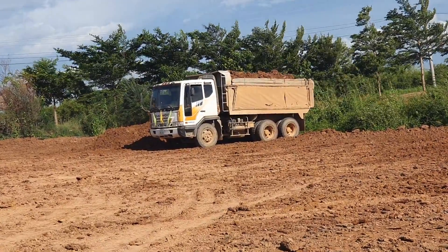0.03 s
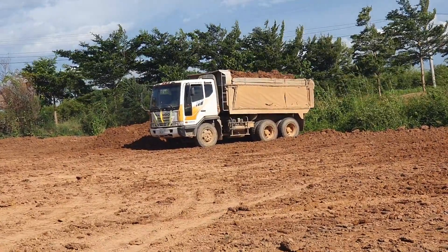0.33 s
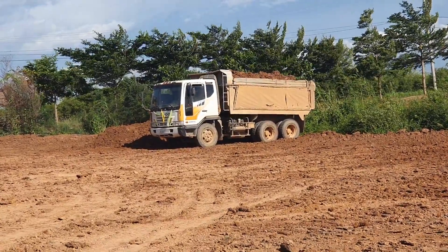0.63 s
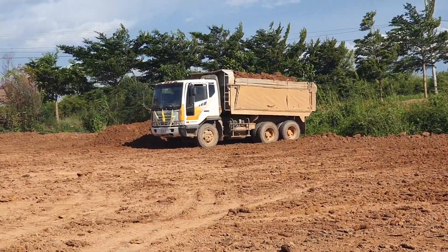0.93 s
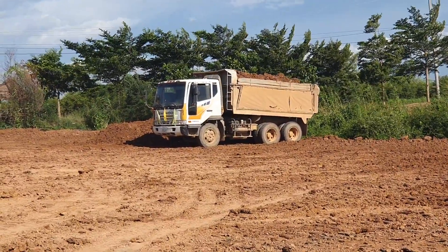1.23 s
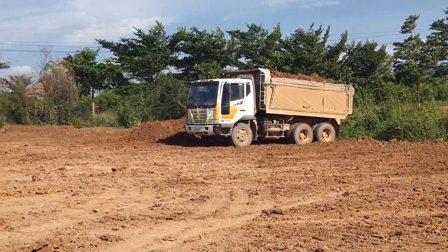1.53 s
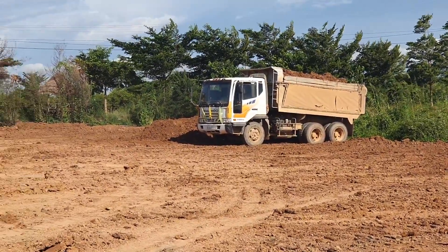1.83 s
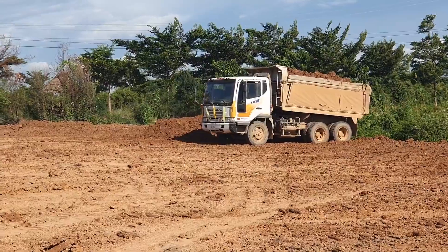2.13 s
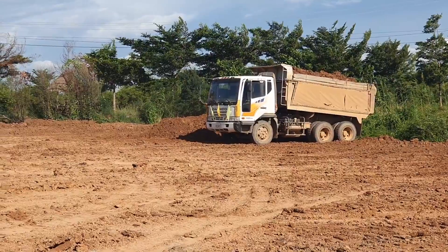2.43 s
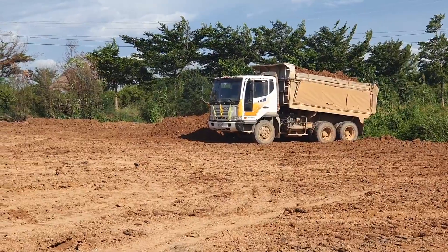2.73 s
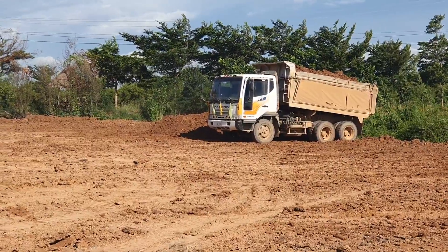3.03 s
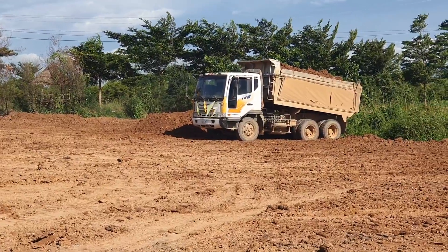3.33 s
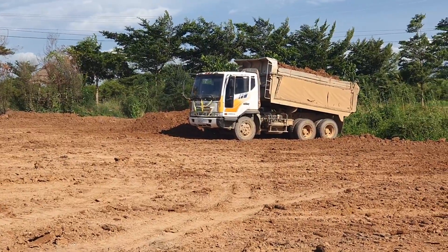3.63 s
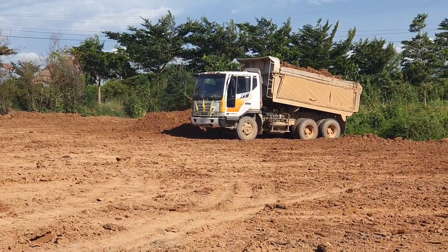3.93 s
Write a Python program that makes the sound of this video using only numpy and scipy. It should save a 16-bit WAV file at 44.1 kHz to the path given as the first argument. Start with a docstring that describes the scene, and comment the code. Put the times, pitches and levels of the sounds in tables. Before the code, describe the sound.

Wind buffets the microphone while a diesel dump truck clatters some way off.

```python
"""A diesel dump truck starts to tip its bed, some way off on an open dirt lot. Its firings blur into a
clatter with ringing panels, exhaust and the odd rasp; the gears whirr and whine, and metal chafes faintly.
Trees rustle throughout, and for the first second a high hiss pulses about eleven times a second.
Up close, gusts hit the microphone: a low rumble, a flutter of short eddies and single buffets that
thud or slap, different at the two ports."""
import sys
import numpy as np
from scipy import signal
from scipy.fft import rfft, irfft, next_fast_len
from scipy.io import wavfile
from scipy.ndimage import uniform_filter1d, map_coordinates

SR = 44100
rng = np.random.default_rng(int(sys.argv[2]) if len(sys.argv) > 2 else 0)


def generate_wav(sig):
    """Save sig (samples, or channels by samples) to the path in sys.argv[1] as 16-bit PCM at SR."""
    pcm = np.round(np.clip(np.atleast_2d(sig).T, -1, 1) * 32767).astype(np.int16)
    wavfile.write(sys.argv[1], SR, pcm)


N = 176400


def amp(db):
    """Decibels to gain."""
    return 10 ** (np.asarray(db) / 20)


def unit(x):
    """Scale to rms 1."""
    return x / np.sqrt(np.mean(x ** 2) + 1e-20)


def along(points, hz):
    """Read an EQ curve of (f/Hz, value) points on a log frequency axis."""
    f, v = np.transpose(points)
    return np.interp(np.log(hz + 1), np.log(f + 1), v)


def curve(rows):
    """An envelope through (t/s, value) points, one value per sample."""
    return np.interp(np.arange(N) / SR, *np.transpose(rows))


def wobble(rate):
    """A smooth random modulator, rate knots a second."""
    return map_coordinates(rng.standard_normal(2048), [np.arange(N) * rate / SR], mode="mirror")


def filtered(x, response):
    """Filter x by a gain given as a function of frequency."""
    size = next_fast_len(N + SR // 2)
    return irfft(rfft(x, size) * response(np.fft.rfftfreq(size, 1 / SR)), size)[..., :N]


def coloured(x, spectrum):
    """x through an EQ curve, at rms 1."""
    return unit(filtered(x, lambda hz: amp(along(spectrum, hz))))


def stereo(mid, side, alike):
    """Mix two unrelated signals to left and right with correlation alike."""
    angle = np.arccos(np.clip(alike, -1, 1)) / 2
    mid, side = np.cos(angle) * mid, np.sin(angle) * side
    return np.array([mid + side, mid - side])


def noise(alike):
    """White stereo noise with a given left-right correlation."""
    return stereo(*rng.standard_normal((2, N)), alike)


def churn(rate, depth_db):
    """A random gain of rms 1, each port its own."""
    return unit(amp(depth_db * np.array([wobble(rate), wobble(rate)])))


def drifting(x, depth_db):
    """x with patches of random gain over frequency and time, at rms 1."""
    spectra = signal.stft(x, nperseg=512)[2]
    patches = uniform_filter1d(rng.standard_normal(spectra.shape[1:]), size=7, axis=0)
    patches = uniform_filter1d(patches, size=12, axis=1)
    return unit(signal.istft(spectra * amp(depth_db * unit(patches)), nperseg=512)[1][:, :N])


def fuzzy_tone(hz, width_hz):
    """A narrow band of noise around a pitch that may move, at rms 1."""
    phase = 2 * np.pi * np.cumsum(hz * np.ones(N)) / SR
    return unit(wobble(width_hz) * np.cos(phase) + wobble(width_hz) * np.sin(phase))


def swells(rows):
    """An envelope of short bell-shaped swells."""
    t = np.arange(N) / SR
    return sum(amp(db) * np.exp(-.5 * ((t - s) / half) ** 2) for s, db, half in rows)


# clatter envelope: t/s, level/dB
CLATTER_LEVEL = [(0, -50), (.35, -51), (.56, -49.5), (.75, -50), (.82, -52.5), (.95, -53.5), (1.11, -49.5),
                 (1.19, -51), (1.3, -47), (1.41, -52), (1.56, -49.5), (1.63, -57.5), (2.3, -56.5),
                 (2.42, -52.5), (2.53, -56.5), (2.72, -55), (2.81, -53.5), (3.05, -54.5), (3.16, -51.5),
                 (3.3, -52), (3.45, -54.5), (4, -50.5)]
# clatter tone: f/Hz, level/dB
CLATTER_EQ = [(400, -62), (800, 1), (1150, -7.5), (1550, 0), (2000, -5), (2600, -9), (3100, -14.5),
              (3800, -16.5), (4800, -14.5), (6000, -20.5), (8000, -33), (15000, -62)]
# engine panel resonances: f/Hz, width/Hz, level/dB
PANEL_MODES = [(1454, 67, -9.5), (1830, 130, -1), (2593, 44, 0.5), (2693, 34, -7), (4820, 110, -16)]
# panel ring against the clatter: t/s, level/dB
RING_LEVEL = [(0, -10), (.55, -4.5), (1.3, -10), (2.05, -4.5), (2.4, -11), (4, -10.5)]
# exhaust tone: f/Hz, level/dB
EXHAUST_EQ = [(20, -10), (40, -8), (70, -12), (110, -3), (170, -24), (300, 0.5), (450, -1), (700, -5.5),
              (1000, -15), (1400, -17.5), (3000, -47)]
FIRING_HZ, KNOCK_S, KNOCK_SHARE = 32.82, 0.0054, 0.14
EXHAUST_DB, EXHAUST_FOLLOWS = -43.5, 0.55  # the exhaust swells with the clatter, but less


def engine():
    """Each firing knocks the block, rings its panels and puffs the exhaust; distance blurs the beat."""
    def panels(f):
        return sum(amp(db) * 1j * f * width / (hz * hz - f * f + 1j * f * width)
                   for hz, width, db in PANEL_MODES)

    firings = np.cumsum(FIRING_HZ * (1 + .01 * wobble(3.3))) / SR
    accent = amp([9, 0, -5, 3, 3.5, -1.5])[firings.astype(int) % 6]  # six uneven cylinders
    knock = unit(accent * np.exp(-(firings % 1) / FIRING_HZ / KNOCK_S))
    beat = np.sqrt(1 - KNOCK_SHARE + KNOCK_SHARE * knock ** 2) * amp(.65 * wobble(17))
    clatter = drifting(coloured(beat * noise(0.88), CLATTER_EQ), depth_db=1.5)
    ring = unit(filtered(beat * noise(0.83), panels))
    exhaust = coloured(beat * noise(0.56), EXHAUST_EQ)
    level_db = curve(CLATTER_LEVEL)
    exhaust_db = EXHAUST_DB + EXHAUST_FOLLOWS * (level_db - level_db.mean())
    return amp(level_db) * (clatter + amp(curve(RING_LEVEL)) * ring) + amp(exhaust_db) * exhaust


# gear whirr pitch: t/s, f/Hz
WHIRR_PITCH = [(0, 2340), (.7, 2365), (1.0, 2320), (1.3, 2220), (2.8, 2244), (3.1, 2234), (4, 2314)]
# whirr envelope: t/s, level/dB
WHIRR_LEVEL = [(0, -64.5), (.45, -56), (.8, -62), (1.2, -55.5), (1.45, -59), (1.63, -69.5), (2.5, -66.5),
               (2.85, -62.5), (3.4, -71), (3.85, -66), (4, -66)]
# whine envelope: t/s, level/dB
WHINE_LEVEL = [(0, -67), (.35, -63.5), (.6, -69), (1.05, -69), (1.35, -79.5), (4, -74)]


def gears():
    """A wavering whirr that sags under load, and a thin whine above it that soon fades."""
    whirr = fuzzy_tone(curve(WHIRR_PITCH) + 25 * wobble(15), width_hz=170)
    whirr = unit(whirr * amp(3 * wobble(16)))  # level flicker
    whine = fuzzy_tone(hz=4070, width_hz=165)
    return amp(curve(WHIRR_LEVEL)) * whirr + amp(curve(WHINE_LEVEL)) * whine


# rustle envelope: t/s, level/dB
RUSTLE_LEVEL = [(0, -59.5), (1.25, -59), (1.53, -59.5), (1.63, -62.5), (2.1, -62.5), (2.5, -60),
                (2.8, -62.5), (3.02, -58.5), (3.12, -60.5), (3.33, -57.5), (3.55, -57), (3.7, -59),
                (4, -58.5)]
# leaf tone: f/Hz, level/dB
LEAF_EQ = [(1500, -4), (3200, 4), (5000, 2), (6500, -1), (8000, -8.5), (9200, -4), (10500, -1.5),
           (12500, -2), (14000, -6), (15600, -13)]
# leaf pan: f/Hz, left minus right/dB
LEAF_PAN = [(4000, 0.5), (8000, 0), (12000, -7), (15000, -5)]
# high shelf on the rustle: t/s, level/dB
RUSTLE_SHELF = [(0, 2), (1.6, -0.5), (2.5, 2.5), (3.3, 0.5), (3.8, -3.5), (4, -2)]


def trees():
    """Leaves rustle in the wind, brighter on the right."""
    rustle = coloured(noise(0.079), LEAF_EQ)
    rustle = filtered(rustle, lambda hz: amp(np.outer([.5, -.5], along(LEAF_PAN, hz))))
    top = filtered(rustle, lambda hz: np.clip((hz - 6000) / 3000, 0, 1))
    shelf = (amp(curve(RUSTLE_SHELF)) - 1) * top
    return amp(curve(RUSTLE_LEVEL) + .4 * wobble(12)) * (rustle + shelf)


def grains(times, gains, hz, width_s):
    """Sum of short pressure wavelets with random phase."""
    offsets = np.arange(-(SR // 128), SR // 128)
    t = offsets / SR
    bell = gains[:, None] * np.exp(-.5 * (t / width_s[:, None]) ** 2)
    carrier = np.cos(2 * np.pi * (hz[:, None] * t + rng.random((len(times), 1))))
    wavelets = bell * carrier * signal.windows.tukey(len(t))
    at = (np.round(times * SR).astype(int)[:, None] + offsets).clip(-1, N) + 1
    return np.bincount(at.ravel(), wavelets.ravel(), N + 2)[1:-1]


EDDY_HZ, EDDY_SPREAD, EDDY_CYCLES, EDDY_SCATTER_DB = 335, .25, .8, 5.5
EDDY_OCTAVES_PER_DB, EDDY_FALL_DB_PER_OCTAVE = .035, -5


def eddies(gust_db, count=2000):
    """Small eddies stream past one port, pitched higher in stronger gusts; rms 1."""
    times = (np.arange(count) + rng.random(count)) / count * N / SR
    pitch, size = rng.standard_normal((2, count))
    octaves = EDDY_SPREAD / np.log(2) * pitch
    gust_lift = EDDY_OCTAVES_PER_DB * gust_db[(times * SR).astype(int).clip(0, N - 1)]
    hz = EDDY_HZ * 2 ** (octaves + gust_lift)
    level_db = EDDY_SCATTER_DB * np.minimum(size, 2) + EDDY_FALL_DB_PER_OCTAVE * np.maximum(octaves, 0)
    return unit(grains(times, amp(level_db), hz, width_s=EDDY_CYCLES / hz))


# gust envelope driving flutter and wash: t/s, level/dB
GUST_LEVEL = [(0, -43), (.14, -38.5), (.22, -42), (.36, -42.5), (.46, -33.5), (.6, -43), (.78, -47),
              (.92, -49), (1.04, -38), (1.22, -32), (1.3, -37.5), (1.4, -38), (1.44, -32.5), (1.56, -34),
              (1.67, -37.5), (1.88, -42.5), (1.98, -35.5), (2.05, -40.5), (2.21, -34), (2.265, -38),
              (2.32, -36.5), (2.38, -29.5), (2.43, -42.5), (2.49, -34), (2.53, -36.5), (2.66, -43.5),
              (2.78, -30), (2.84, -38), (2.92, -34), (2.97, -38.5), (3.06, -35.5), (3.19, -38),
              (3.3, -30.5), (3.39, -31.5), (3.51, -28.5), (3.6, -32.5), (3.66, -36), (3.76, -29),
              (3.83, -33), (4, -34)]
# wash tone: f/Hz, level/dB
WASH_EQ = [(60, -14), (120, -5), (175, -8), (260, 0), (440, -.5), (600, -10), (780, -23), (1000, -35),
           (1600, -46), (3000, -52), (8000, -67)]
# rumble envelope, before its trim: t/s, level/dB
RUMBLE_LEVEL = [(0, -29.5), (.24, -39.5), (.48, -31), (.66, -37), (.76, -42), (.93, -44.5), (1.2, -30),
                (1.4, -38), (1.58, -30), (1.69, -34), (1.8, -45), (1.92, -44), (2.15, -35), (2.3, -39),
                (2.52, -37), (2.63, -42), (2.8, -33.5), (3.02, -39), (3.45, -32.5), (3.7, -37), (4, -31.5)]
# rumble tone: f/Hz, level/dB
RUMBLE_EQ = [(10, -6), (25, -27), (45, -0.5), (70, -3), (115, -5), (170, -13), (300, -19.5), (800, -64.5)]
EDDY_TRIM_DB, WASH_TRIM_DB, RUMBLE_TRIM_DB, WASH_GROWS = 1, -1, 2, 1.24


def wind():
    """Gusts on the microphone drive eddies and a turbulent wash, over a lumpy rumble."""
    level_db = curve(GUST_LEVEL)
    gust_db = level_db - level_db.mean()
    flutter = amp(EDDY_TRIM_DB + gust_db) * np.array([eddies(gust_db), eddies(gust_db)])
    wash = coloured(noise(0.078), WASH_EQ) * churn(rate=130, depth_db=4.0)
    wash *= amp(WASH_TRIM_DB + WASH_GROWS * gust_db)
    surge = unit(amp(2.5 * wobble(27.98)))
    rumble = coloured(noise(-0.021) * churn(rate=34, depth_db=3.0), RUMBLE_EQ)
    rumble *= amp(RUMBLE_TRIM_DB + curve(RUMBLE_LEVEL))
    return amp(level_db.mean()) * surge * (flutter + wash) + rumble


# wind hits, before trim and stretch:
# peak t/s, level/dB, length/s, f/Hz, left minus right/dB, left-right correlation, hard edge/dB
BUFFET_HITS = [(0.04, -24, 0.0078, 360, 1, 0.5, -7), (0.086, -31.5, 0.018, 337, 3.5, -0.65, -6),
               (0.107, -26, .065, 70, 1, -1.07, 9), (0.265, -28, 0.015, 320, 4, 0.24, -10),
               (0.332, -22.5, 0.044, 82, -3, -.6, 12), (0.342, -26.5, 0.016, 264, 3, -.3, -6),
               (0.427, -20.5, .011, 355, -4, -0.46, -4), (0.468, -21, 0.015, 290, 2, 0.6, 1),
               (0.479, -27, 0.036, 75, 0, .9, 3), (0.558, -23.5, 0.0069, 300, 4, .9, -4),
               (.619, -26.5, 0.013, 129, 5, 0.89, 0), (0.662, -27, 0.014, 358, 0, 0.82, -17),
               (1.116, -23, 0.021, 80, 2, -.95, 3), (1.117, -19.5, 0.011, 320, 3, -0.99, -2),
               (1.159, -20.5, 0.018, 315, 0, -0.59, -3), (1.206, -21, 0.015, 317, 6, 0.14, 9),
               (1.244, -22, 0.01, 217, 3, 0.9, -9), (1.268, -34, 0.09, 72, 2, -0.16, 9),
               (1.272, -20, 0.0083, 323, 0, 0.22, -2), (1.301, -18.5, 0.013, 363, 3, 0.33, 6),
               (1.312, -16.5, 0.012, 378, -2.5, -0.052, -4), (1.337, -29, 0.0065, 433, 4, 0.17, 11),
               (1.367, -27, 0.016, 315, -4, -0.12, -4), (1.452, -30, 0.027, 385, -3, -.3, -7),
               (1.484, -33, 0.021, 90, -6, 0.79, -7), (1.497, -22.5, 0.0072, 355, 3, 0.23, -2),
               (1.532, -20, 0.031, 275, -1, -0.003, -5), (1.552, -20, 0.0076, 350, 4, 0.23, 11),
               (1.56, -36, 0.0053, 1010, 9, 0.19, -5), (1.571, -21, 0.017, 382, -2, 0.19, -2),
               (1.586, -22, 0.036, 65, -3, -.6, -2), (1.604, -27, 0.014, 197, 0, .6, 9),
               (1.645, -27, 0.0091, 317, 5, .3, -15), (1.712, -26, 0.0085, 308, -3, 0.21, 0),
               (1.991, -28, .02, 130, 2, 0.77, -4), (1.992, -25, 0.016, 326, -5, .2, 7),
               (2.096, -20.5, 0.012, 293, 0, -0.4, 0), (2.147, -31, .007, 398, -1, 0.21, 5),
               (2.183, -23, 0.012, 310, -7, -0.88, -4), (2.186, -25.5, .024, 99, 1, .7, -7),
               (2.21, -24, 0.0056, 553, 3, .4, -12), (2.218, -23, 0.027, 402, 1.5, -0.16, -2),
               (2.288, -25, 0.01, 365, 0, 0.26, -8), (2.308, -18.5, .012, 378, 2.5, -0.3, 2),
               (2.327, -22, 0.0084, 337, -0.5, 0.5, -4), (2.374, -25, 0.016, 480, 10, 0.67, -3),
               (2.457, -22, 0.0054, 390, 8, -0.0051, 4), (2.482, -20, 0.013, 330, 0, .1, -4),
               (2.568, -19, 0.0078, 365, 2.5, 0.46, -11), (2.615, -28, 0.017, 348, 4, -0.24, -6),
               (2.735, -20.5, 0.026, 364, 2.5, -.2, -12), (2.753, -25, 0.018, 89, 17, .6, 0),
               (2.77, -18.5, 0.015, 300, 1, 0.3, -2), (2.79, -25, 0.011, 433, 6, 0.03, 8),
               (2.812, -30, 0.027, 110, -10, 0.46, 0), (3.018, -21, .011, 304, -3.5, -0.74, -10),
               (3.051, -24, 0.01, 324, 5, 0.3, -2), (3.077, -28, 0.025, 330, -11, -0.61, 0),
               (3.095, -23.5, 0.023, 92, 0, 0.84, 9), (3.149, -24, 0.017, 332, 6, 0.11, 11),
               (3.245, -28, .009, 403, 0, 0.48, 11), (3.276, -18, 0.012, 456, 1, -0.002, -5),
               (3.298, -20, 0.012, 376, 4, 0, 12), (3.308, -23, .008, 220, -3, 0.72, 4),
               (3.365, -21.5, 0.014, 380, 2, 0.16, -1), (3.405, -26, .017, 99, 9, 0.79, 2),
               (3.408, -27, .014, 350, -3, .3, 3), (3.459, -22, 0.015, 293, 1, 0, 0),
               (3.478, -28, .03, 90, -8, 0.88, 0), (3.491, -20.5, 0.011, 320, -6, 0.46, 5),
               (3.519, -26, 0.02, 328, -4, 0, 14), (3.531, -21.5, 0.017, 574, 2, .3, -10),
               (3.563, -21, 0.0099, 460, 2, 0.15, 15), (3.604, -22.5, 0.029, 340, -12, -0.24, 1),
               (3.607, -23.5, .026, 80, -4, -.7, 0), (3.63, -28.5, .007, 520, 6, 0.11, 5),
               (3.677, -24.5, 0.014, 387, 3.5, -0.34, 0), (3.718, -21, .016, 335, 4, -0.34, 6),
               (3.741, -20.5, 0.013, 380, 4, 0.5, 10), (3.783, -20, .012, 403, 4, .5, 1),
               (3.79, -15.5, 0.0076, 337, 0.5, -0.68, 2), (3.858, -27, .03, 90, -6, -0.52, 2),
               (3.863, -16, 0.013, 362, 2, -0.0081, 0), (3.886, -28, 0.0069, 368, -6, -0.99, 4),
               (3.918, -23, 0.019, 90, 2, .7, 2), (3.931, -19, 0.012, 362, 3, 0.085, -3),
               (3.957, -19.5, 0.016, 363, 1.5, -.2, -6), (3.992, -19.5, 0.017, 370, 4, -.6, 20)]
# buffet tone: multiple of its pitch, level/dB
BUFFET_EQ = [(.15, -16), (.42, -7.5), (.7, 1), (1.15, 0), (1.6, -10), (2.1, -22.5), (3, -32), (6, -50),
             (12, -68), (30, -100)]
# where a hard edge brightens it: multiple of its pitch, share of the edge
EDGE_EQ = [(1.3, 0.25), (3, 1.04), (4, 1), (6, 0.13), (12, 0.13)]
BUFFET_TRIM_DB, BUFFET_STRETCH, BUFFET_CORE_DB = -1, 0.85, -5
BUFFET_RISE_SHARE, BUFFET_BLUNT, BUFFET_EVEN = 0.34, 1.66, .8


def buffets():
    """Each large eddy is a brief, even burst of low noise: slow ones thud, fast ones slap."""
    size = 8192
    t, hz = (np.arange(size) - size // 2) / SR, np.fft.rfftfreq(size, 1 / SR)
    slope_share = np.where(t < 0, BUFFET_RISE_SHARE, 1 - BUFFET_RISE_SHARE)
    out = np.zeros((2, N + 2 * size))
    for peak_s, db, length, pitch, pan_db, alike, edge_db in BUFFET_HITS:
        span = length * BUFFET_STRETCH
        swell = np.exp(-.5 * np.abs(t / (span * slope_share)) ** BUFFET_BLUNT)
        swell += amp(BUFFET_CORE_DB) * np.exp(-.5 * (t * pitch) ** 2)  # hard centre
        half_eq = amp(along(np.array(BUFFET_EQ) * [pitch, 1], hz) / 2)  # before and after the swell
        edge = amp(edge_db * along(np.array(EDGE_EQ) * [pitch, 1], hz))
        swirl = signal.hilbert(irfft(rfft(rng.standard_normal((2, size))) * half_eq))
        swirl = swirl.real / np.abs(swirl) ** BUFFET_EVEN  # compress the noise's own peaks
        mid, side = irfft(rfft(swell * swirl) * half_eq * edge)
        side = side - mid * (mid @ side) / (mid @ mid)  # decorrelate
        ports = stereo(unit(mid), unit(side), alike) * amp([[pan_db / 2], [-pan_db / 2]])
        gain = amp(db + BUFFET_TRIM_DB) * np.sqrt(span * SR / size)
        out[:, round(peak_s * SR):][:, :size] += gain * unit(ports)
    return out[:, size // 2:][:, :N]


# hiss pulses: onset t/s, level/dB
HISS_PULSES = [(.072, -61), (.165, -53.5), (.272, -61), (.352, -57.5), (.445, -53.5), (.54, -57),
               (.62, -59), (.715, -57.5), (.805, -60), (.905, -64), (.995, -61), (1.09, -59), (1.175, -62)]
# hiss tone: f/Hz, level/dB
HISS_EQ = [(2500, -17), (4500, -5), (6000, -9), (8000, -10), (10500, -3), (12000, -6), (13500, -12),
           (15500, -24)]


def hiss(attack_s=0.019, decay_s=0.047):
    """A high hiss that swells quickly and fades, again and again."""
    t = np.arange(N) / SR
    envelope = np.zeros(N)
    for onset, db in HISS_PULSES:
        attack = np.clip((t - onset) / attack_s, 0, 1)
        decay = np.exp(-np.maximum(t - onset - attack_s, 0) / decay_s)
        envelope += amp(db) * attack * decay
    return envelope * coloured(noise(0.54), HISS_EQ)


# engine rasps: peak t/s, level/dB, half length/s
RASP_HITS = [(.285, -48, 0.028), (.755, -54, .012), (3.115, -52, 0.017)]
# rasp tone: f/Hz, level/dB
RASP_EQ = [(700, -40), (1200, -14), (1500, 8), (1850, -1), (2200, -7), (2800, -18), (6000, -49)]


def rasps():
    """The engine rasps now and then in short bursts of midrange noise."""
    return swells(RASP_HITS) * coloured(noise(0.98), RASP_EQ)


# metal chafes: peak t/s, level/dB, half length/s
CHAFE_HITS = [(2.62, -65, .025), (2.692, -64, .012), (2.77, -71, .025), (2.98, -71, 0.037),
              (3.25, -71, 0.032), (3.85, -64, 0.011)]


def chafes():
    """Metal rubs in faint, thin squeaks as the bed rises."""
    return swells(CHAFE_HITS) * fuzzy_tone(hz=5000, width_hz=240)


def scene():
    """Truck, hiss and trees behind the wind on the microphone."""
    truck = engine() + gears() + rasps() + chafes()
    return truck + hiss() + trees() + wind() + buffets()


TOP_HZ = 15720


def record(dry):
    """A brick-wall low-pass on the whole mix."""
    return filtered(dry, lambda hz: hz < TOP_HZ)


dry = scene()
out = record(dry)
generate_wav(out)
```